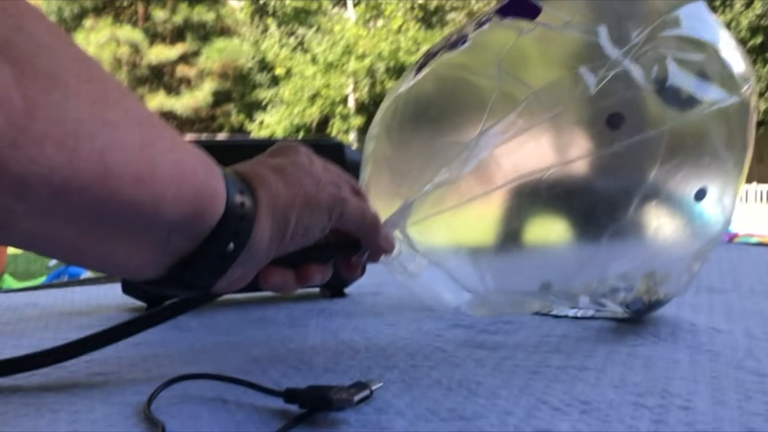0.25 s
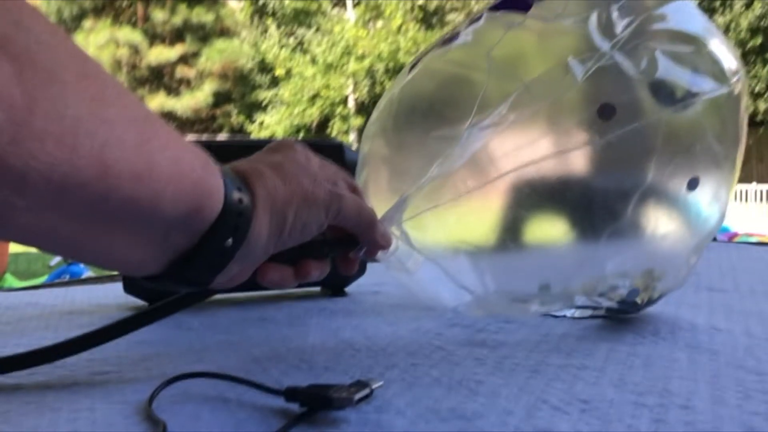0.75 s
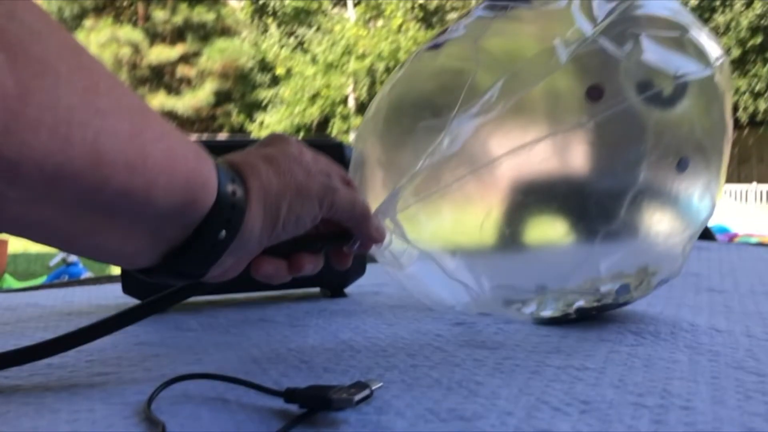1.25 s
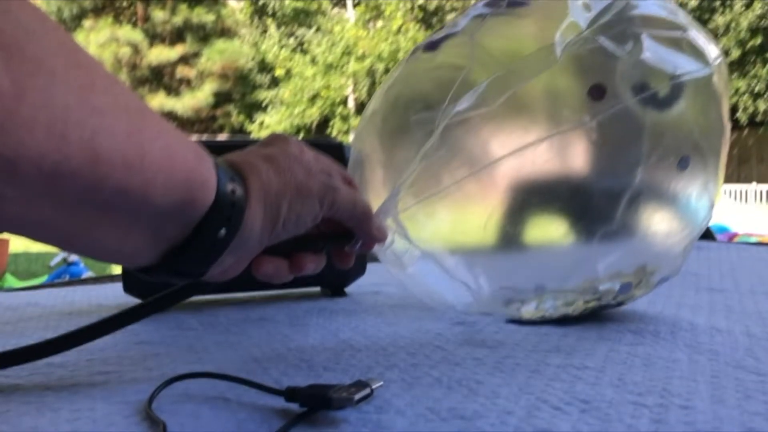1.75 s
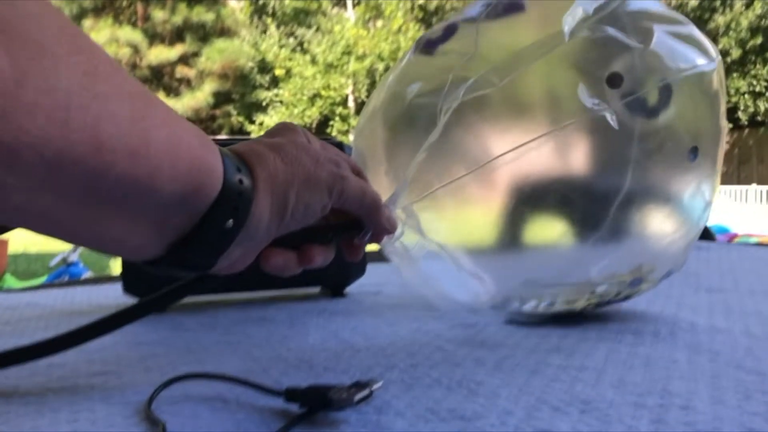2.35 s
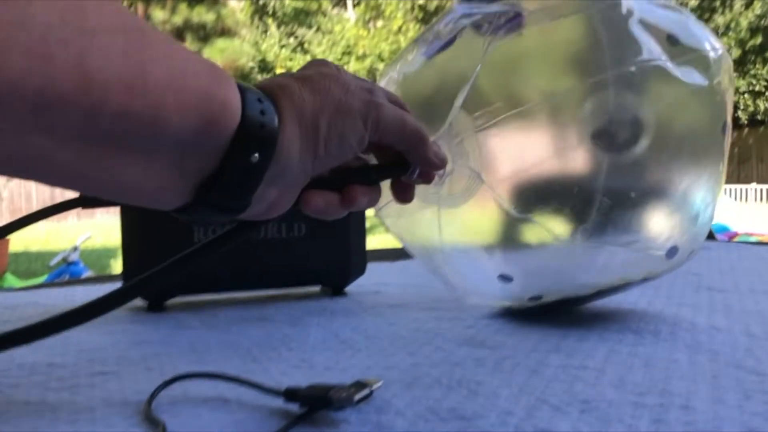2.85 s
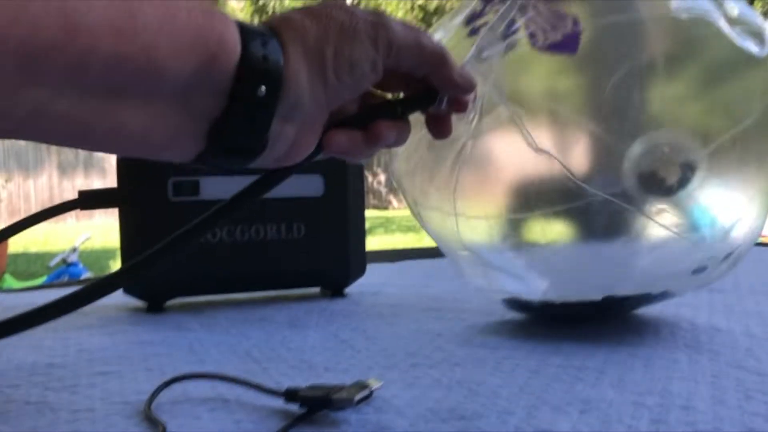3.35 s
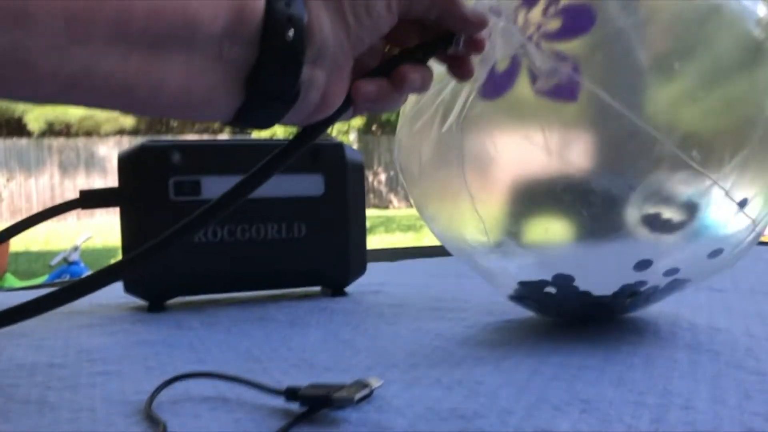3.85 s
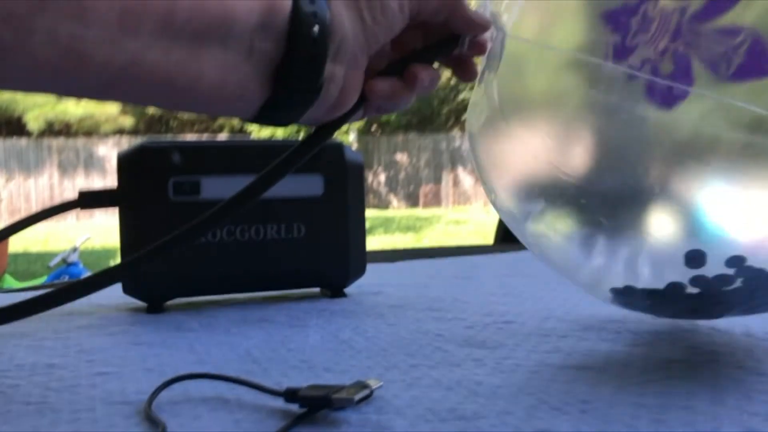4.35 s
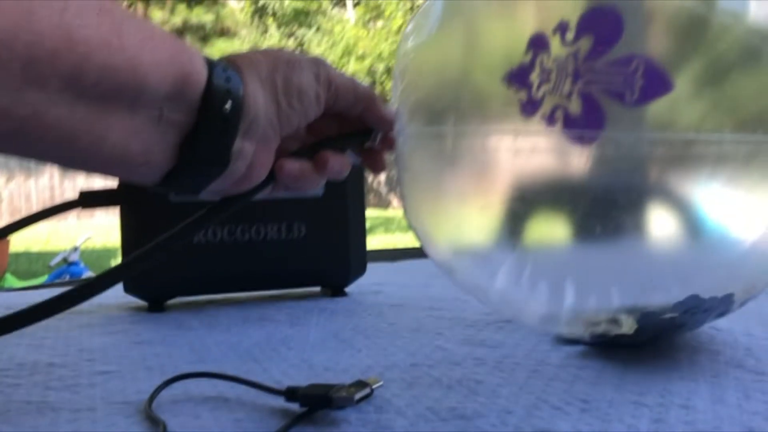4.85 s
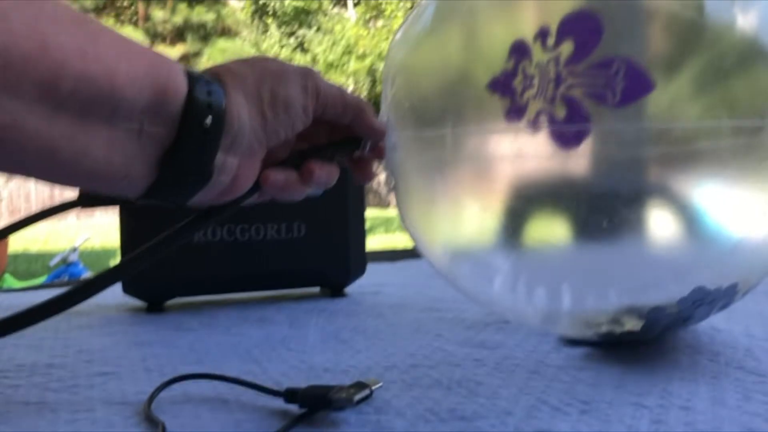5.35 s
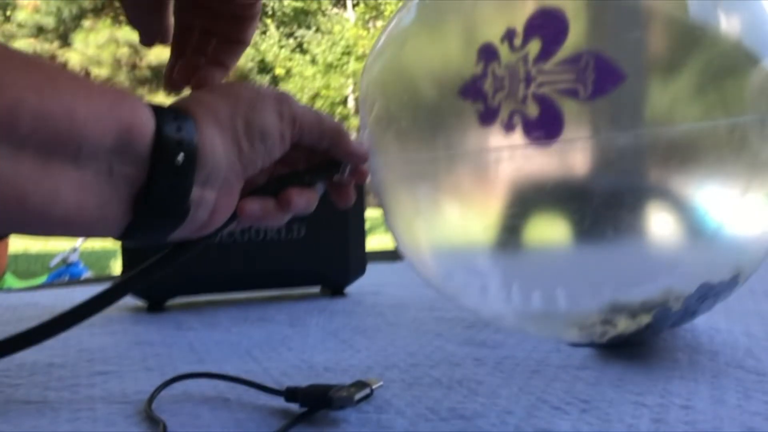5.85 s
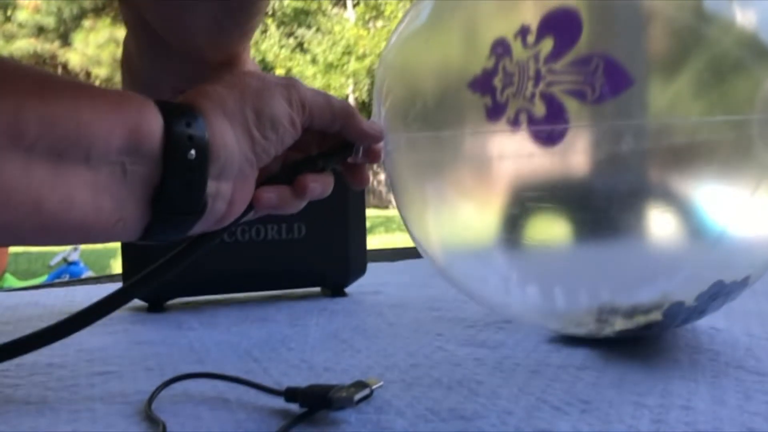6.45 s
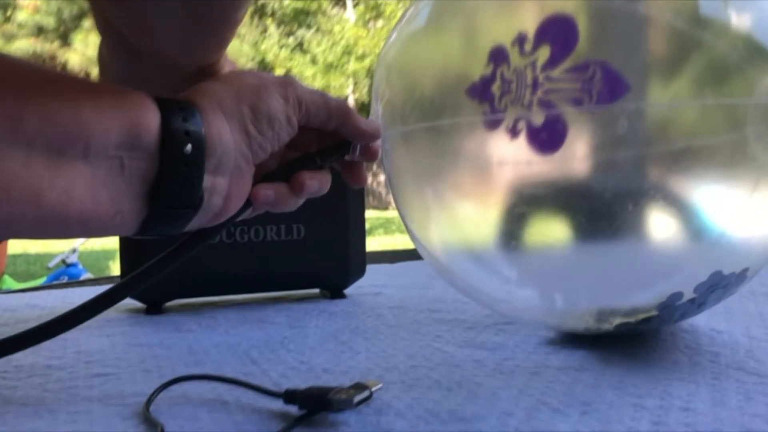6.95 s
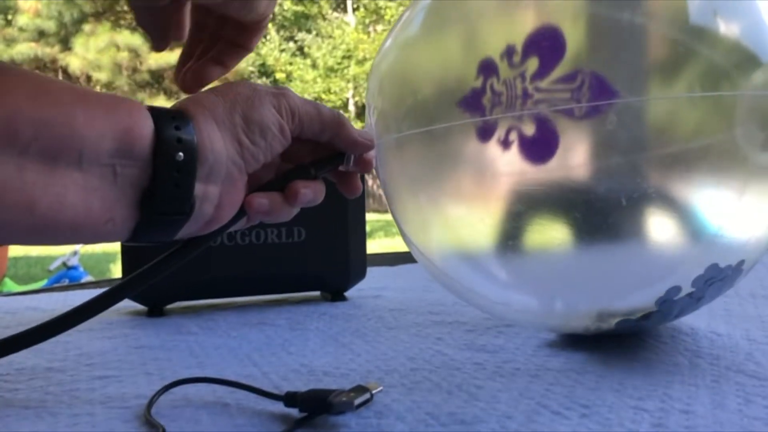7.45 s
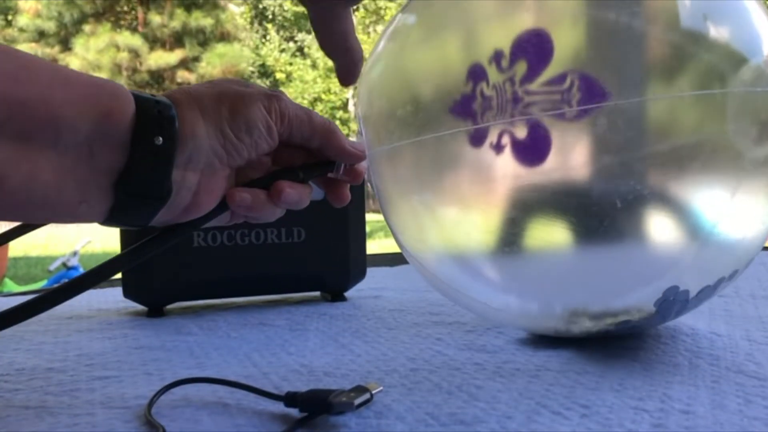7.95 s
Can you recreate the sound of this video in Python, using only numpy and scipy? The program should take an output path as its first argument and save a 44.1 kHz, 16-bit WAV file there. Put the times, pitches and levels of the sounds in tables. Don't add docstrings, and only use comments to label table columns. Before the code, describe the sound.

Harsh rattling drone of a little air pump filling a plastic ball, falling quickly in pitch to a halt, then soft knocks and crinkles.

```python
import sys
import numpy as np
from scipy import signal
from scipy.fft import rfft, irfft
from scipy.io import wavfile
from scipy.ndimage import uniform_filter1d

SR = 44100
rng = np.random.default_rng(int(sys.argv[2]) if len(sys.argv) > 2 else 0)


def wrap_up_sound(samples):
    columns = np.atleast_2d(samples).T
    tamed = np.clip(columns, -1, 1)
    steps = np.round(tamed * 32767).astype(np.int16)
    wavfile.write(sys.argv[1], SR, steps)


def attenuation_scalar(level_db):
    decades = np.asarray(level_db, float) / 20
    return 10 ** decades


N = 361608


def evened(x):
    return x / np.sqrt(np.mean(x ** 2) + 1e-20)


def curves(rows, off=-120.):
    s, *columns = np.transpose(rows)
    return [np.interp(np.arange(N) / SR, s, c, left=off, right=off) for c in columns]


def coloured(x, points):
    f, db = np.transpose(points)
    hz = np.fft.rfftfreq(N, 1 / SR)
    gain = attenuation_scalar(np.interp(np.log(hz + 1), np.log(f + 1), db))
    return evened(irfft(rfft(x) * gain, N))


def band(x, lo_hz, hi_hz):
    sos = signal.butter(4, [lo_hz, min(hi_hz, 20000)], "band", fs=SR, output="sos")
    return evened(signal.sosfilt(sos, x))


def ring(x, hz, width):
    r = np.exp(-np.pi * width / SR)
    w = 2 * np.pi * hz / SR
    return signal.lfilter([np.sin(w)], [1, -2 * r * np.cos(w), r * r], x)


def drift(rate_hz):
    size = int(SR / rate_hz)
    return evened(uniform_filter1d(uniform_filter1d(rng.standard_normal(N), size), size))


def stroke(turns, start, rise, fall):
    u = (turns - start) % 1
    return (1 - np.exp(-(u / rise) ** 2)) * np.exp(-u / fall)


def hits(turns, angle):
    return 1. * (np.diff(np.floor(turns - angle), prepend=-1) > 0)


def flaws(turns, size):
    return np.interp(turns % 1 * size, np.arange(size + 1), rng.standard_normal(size + 1))


OFF_S, COAST_S, FRICTION = 7.022, .41, .74
FULL_S = 7.3


def layer(rule, speed, dies=.05):
    slack_db, full_db, off_db, power = rule
    t = np.arange(N) / SR
    step = np.clip((t - OFF_S) / .03, 0, 1)
    level = attenuation_scalar(slack_db + full_db * np.minimum(t / FULL_S, 1) + off_db * step)
    return level * speed ** power * np.minimum(speed / dies, 1) ** 3.5


# (frequency [Hz], density [dB per Hz])
YARD_SPECTRUM = [(18, -53), (30, -29.5), (69, -3), (95, -8), (108, -10), (127, -1.5), (148, -14.5),
                 (214, -10), (361, -12.5), (793, -18.5), (2320, -37), (12400, -53), (15700, -57)]
YARD_DB = -47


def yard():
    return attenuation_scalar(YARD_DB + 0.66 * drift(5.4)) * coloured(rng.standard_normal(N), YARD_SPECTRUM)


# (frequency [Hz], width [Hz], gain [dB])
CASE_MODES = [(371, 90, 8), (820, 90, 0), (1190, 100, 7), (1910, 67, 2.5), (4180, 330, -8.5)]
TONE, OCTAVE = (-29.5, -6, 3.5, 0.5), (-26.5, 0.2, 1.5, 4)
LOADED_FROM, EASING = (0.12, .1), (1, 0)
TEETH_PART = 0.37
GEAR_TEETH, PINION_TEETH = 49, 11


def gears(turns, mesh_hz, speed):
    coasting = .45 * (np.arange(N) > 7.03 * SR)
    slack = 0.059 + .5 * coasting
    wobble = 0.062 * np.sin(2 * np.pi * (turns - .3))
    jitter = (0.013 + 0.22 * coasting) * drift(170)
    angle = 2 * np.pi * (GEAR_TEETH * turns + wobble + jitter)
    out = 0
    for k, (rule, start, ease) in enumerate(zip((TONE, OCTAVE), LOADED_FROM, EASING), start=1):
        u = (turns - start) % 1
        push = np.clip(u / 0.13, 0, 1) * np.clip((.58 - u) / 0.22, 0, 1)
        load = slack + push * (1 - .5 * u) * np.exp(-ease * u)
        boost_db = sum(d / (1 + (2 * (k * mesh_hz - f) / w) ** 2) for f, w, d in CASE_MODES)
        flutter = drift(160)
        wander_db = (1.1 + 3 * coasting) * flutter + .55 * evened(uniform_filter1d(flutter, size=5000))
        level = layer(rule, speed, TEETH_PART ** k) * attenuation_scalar(boost_db + wander_db)
        out = out + level * evened(load ** (1 + 0.071 * k)) * np.sqrt(2) * np.sin(k * angle)
    return out


# (angle [turns], mode frequency [Hz], width [Hz], level [dB], unevenness [dB])
VALVE_BLOWS = [(.74, 800, 42, -5, 3.5), (.74, 890, 45, -3, 5.5), (.74, 988, 54, -4, 4.5),
               (0.221, 980, 95, -11, 4), (.57, 1155, 58, -3.5, 3.5), (0.65, 513, 94, -20.5, -2),
               (0.5914, 702, 123, -6.5, 3), (0.57, 1465, 110, -9, 9.5), (.61, 1835, 73, 1.5, 6),
               (0.5, 2800, 530, -12, 20), (.62, 3890, 150, -5.5, 6.5), (0.5, 4180, 96, -4, -0.5),
               (0.25, 4080, 270, -5, 3), (0.12, 3200, 1200, -6, 9.5), (.77, 1835, 130, -3, 9)]


def valve_knocks(turns, rotor):
    knocks = np.zeros(N)
    for angle, hz, width, db, uneven_db in VALVE_BLOWS:
        chance = np.clip(rng.standard_normal(N), -1.8, 1.8)
        cycle = np.sin(2 * np.pi * (rotor + rng.random()))
        size = attenuation_scalar(min(uneven_db, 2.3) * (cycle + .5 * chance))
        play = .0013 * drift(60)
        struck = ring(hits(turns + play, angle) * size, hz, width)
        knocks += attenuation_scalar(db) * evened(ring(struck, hz, 2.7 * width))
    return evened(knocks)


# (frequency [Hz], width [Hz], level [dB])
CHAMBER_MODES = [(295.4, 15, 2), (401.4, 9.8, 2.5)]


def chamber_thump(turns):
    (hz, width, db), (hz2, width2, db2) = CHAMBER_MODES
    push = hits(turns, 0.905)
    lower = attenuation_scalar(db) * evened(ring(push, hz, width))
    upper = attenuation_scalar(db2) * evened(ring(push, hz2, width2))
    return band(lower - upper, 256, 472.5)


# (frequency [Hz], density [dB per Hz])
RATTLE_SPECTRUM = [(59, -44.5), (100, -36.5), (227, -8), (271, -14.5), (384, -8.5), (490, -14), (799, 0),
                   (1300, -3.5), (1820, -2), (2050, -2.5), (2320, -6), (3070, -8), (4580, 0), (4920, -2),
                   (6500, -20), (8450, -49.5), (14300, -120)]


def tooth_rattle(turns, rotor, speed):
    gate = evened(0.24 + stroke(turns, 0.47, 0.16, 0.25))
    teeth = .6 * flaws(turns, size=130) + .45 * flaws(rotor, size=30) + 1.25 * rng.standard_normal(N)
    rattle = coloured(teeth * gate, RATTLE_SPECTRUM)
    dull = signal.lfilter(*signal.butter(2, 2200, fs=SR), rattle)
    return dull + speed ** 0.64 * (rattle - dull)


# (multiple of the turn rate, level [dB])
CRANK_ORDERS = [(1, 1.5), (2, 0.5), (3, -10), (4, -5.5), (5, -22)]
# (multiple of the rotor rate, level [dB])
ROTOR_ORDERS = [(1, -56), (3, -56.5), (4, -71), (8, -57), (9, -44.5)]
TABLE = (-43.5, 2, -1, 0.5)
PRESS_S, PRESS_IN_S, LET_GO_S, LET_GO_OUT_S, PRESS_DB = 6.5, .2, 6.88, 0.11, -12


def table_shake(turns, rotor, speed):
    t = np.arange(N) / SR
    release = 1 - (t - LET_GO_S) / LET_GO_OUT_S
    press = np.clip(np.minimum((t - PRESS_S) / PRESS_IN_S, release), 0, 1)
    sway = attenuation_scalar(4 + PRESS_DB * press) * layer(TABLE, speed) * np.sin(2 * np.pi * turns)
    shake = sum(attenuation_scalar(db) * np.sin(2 * np.pi * k * (turns - .25)) for k, db in CRANK_ORDERS[1:])
    motor = sum(attenuation_scalar(db) * np.sqrt(2) * np.sin(2 * np.pi * k * rotor) for k, db in ROTOR_ORDERS)
    return sway + speed ** 2.1 * (attenuation_scalar(-40.0) * shake + motor)


KNOCK, THUMP = (-27, -0.55, 1, 0.3), (-32.5, 2, -1, 5)
BLOWS_DIE = 0.15


def housing(turns, speed):
    rotor = turns * GEAR_TEETH / PINION_TEETH
    blows = speed ** 1.1 * valve_knocks(turns, rotor) + attenuation_scalar(1.5) * tooth_rattle(turns, rotor, speed)
    thump = layer(THUMP, speed) * chamber_thump(turns)
    return layer(KNOCK, speed, BLOWS_DIE) * blows + thump + table_shake(turns, rotor, speed)


# (frequency [Hz], density [dB per Hz])
HISS_SPECTRUM = [(2880, -35), (4900, 9), (5450, -1), (5950, 1.5), (6810, -4.5), (7260, -14), (7540, -4),
                 (8640, -10), (10200, -13), (14000, -11), (15600, -12)]
# (frequency [Hz], width [Hz], level [dB])
NOZZLE_MODES = [(5700, 34, 9.5), (6090, 19, 4.5), (7100, 93, 2.5), (7500, 48, -1), (8470, 67, -2.5),
                (8840, 83, -6), (9300, 88, -10.5), (11500, 92, -4)]
# (time [s], resonance of the gap [Hz], leak [dB], nozzle turned to the listener [dB])
VALVE_GRIP = [(0.0, 5370, 0, 0.5), (1.27, 5200, -0.5, -1), (1.9, 5300, 3, -1), (2.25, 5570, 5, -1),
              (2.68, 5610, -0.5, -2.5), (3.01, 5360, 0.5, 1.5), (3.26, 5800, -0.5, -0.5),
              (3.44, 5560, 2, 0), (3.85, 5450, -1.5, 0), (4.04, 5200, -1, -4), (4.24, 5300, -1.5, -2),
              (4.5, 5690, -1.5, 0.5), (4.87, 5700, 1, 0), (5.9, 5660, 1, 1.5), (6.2, 5900, 1.5, 2),
              (6.6, 5700, -2.5, 0), (7.05, 5410, -4, -2.5)]
LEAK_HISS, JET_HISS, TOP_HISS = (-33, 1, -0.5, 0.7), (-38, 6, -1.5, 0.2), (-37.5, 3.5, 3, 0.5)
AIR_DIES = 0.35
JET_FACING, TOP_FACING = 1.37, 0.89
HOSE_HZ, HOSE_ECHO = 467.5, 0.54


def nozzle(turns, speed):
    gap_hz, leak_db, facing_db = curves(VALVE_GRIP + [(N / SR, *VALVE_GRIP[-1][1:])])
    white, n = rng.standard_normal(N), np.arange(N)
    lag = SR / HOSE_HZ * (1 + 0.013 * drift(1.3))
    echoes = sum(HOSE_ECHO ** k * np.interp(n - k * lag, n, white) for k in range(5))
    air = coloured(echoes, HISS_SPECTRUM)
    white = rng.standard_normal(N)
    whistles = np.zeros(N)
    for hz, width, db in NOZZLE_MODES:
        swell_db = 6.6 * np.tanh(0.94 * drift(11) + 0.78 * drift(1.9))
        whistles += attenuation_scalar(db + swell_db) * evened(ring(white, hz, width))
    air += attenuation_scalar(-7.5) * evened(whistles)
    turn = np.exp(2j * np.pi * np.cumsum(gap_hz) / SR)
    smooth = signal.lfilter([1], [1, -np.exp(-np.pi * 250 / SR)], white / turn)
    leak = evened((turn * smooth).real)
    low = evened(band(air, 4840, 6980) + attenuation_scalar(-6.0 + 2.2 * drift(22)) * band(leak, 4830, 6600))
    puff = evened(0.26 * speed ** 2.5 + stroke(turns, 0.42, 0.13, 0.27)) * attenuation_scalar(0.75 * drift(90))
    low = layer(LEAK_HISS, speed, AIR_DIES) * attenuation_scalar(leak_db) * low
    jet = layer(JET_HISS, speed, AIR_DIES) * attenuation_scalar(JET_FACING * facing_db) * band(air, 6740, 9570)
    top = layer(TOP_HISS, speed, AIR_DIES) * attenuation_scalar(TOP_FACING * facing_db) * band(air, 9960, 17000)
    return puff * (low + jet + top)


# (time [s], peak level [dB], length [s])
HAND_SHIFTS = [
    (.04, -33, .08),
    (.27, -32, .1),
    (3.72, -41, .3),
    (4.04, -42, .08),
    (5.54, -42.5, .4),
    (6.75, -33.5, .12),
    (6.858, -31.5, .08),
]


def hands():
    t = np.arange(N) / SR
    rumble = attenuation_scalar(-48) + sum(attenuation_scalar(db) * np.exp(-((t - s) / length) ** 2) for s, db, length in HAND_SHIFTS)
    return attenuation_scalar(-12.0) * rumble * (t < 7.35) * band(rng.standard_normal(N), 104, 304)


# (time [s], level [dB])
TOOTH_GRIND = [
    (7.175, -25.5),
    (7.181, -30),
    (7.213, -23),
    (7.219, -33),
    (7.319, -34.5),
    (7.36, -56),
]
# (frequency [Hz], width [Hz], level [dB])
GRIND_MODES = [(371, 59, -9.5), (868, 37, 1), (1170, 110, 3), (1806, 87, -1.5), (3900, 300, -17)]
# (time [s], peak level [dB], pitch [Hz])
LOOSE_KNOCKS = [
    (7.099, -12.5, 860),
    (7.128, -11.5, 1200),
    (7.171, -15, 1840),
    (7.223, -18, 1020),
    (7.31, -22.5, 368),
]


def run_down():
    drag = rng.standard_normal(N) * attenuation_scalar(2.5 * drift(150))
    scrape = evened(sum(attenuation_scalar(db) * evened(ring(drag, f, w)) for f, w, db in GRIND_MODES))
    out = attenuation_scalar(curves(TOOTH_GRIND)[0] - 3.5) * scrape
    for s, db, hz in LOOSE_KNOCKS:
        click = 1. * (np.arange(N) == round(s * SR))
        bright = min(hz / 2400, .5) ** 1.5 * ring(click, 3600, 1500)
        out += attenuation_scalar(db - 1.5) * (ring(click, hz, 95) + bright)
    return out


# (time [s], peak level [dB], pitch [Hz])
CASE_ROCKS = [
    (7.382, -33, 317),
    (7.428, -36, 374),
    (7.488, -34, 450),
    (7.539, -33, 437),
    (7.554, -35, 480),
    (7.601, -33, 423),
    (7.662, -36, 447),
]


def rocking():
    out, t = np.zeros(N + 2000), np.arange(2000) / SR
    for s, db, hz in CASE_ROCKS:
        thud = np.sin(2 * np.pi * hz * t)
        thud += 0.33 * np.sin(2 * np.pi * rng.uniform(1150, 1400) * t)
        thud += 0.33 * np.sin(2 * np.pi * 800 * t)
        envelope = np.exp(-t / 0.0071) * (1 - np.exp(-t / 0.00062))
        out[round(s * SR):][:2000] += attenuation_scalar(db - 2) * thud * envelope
    return out[:N]


# (time [s], peak level [dB], pitch [Hz], bright edge [dB])
PLASTIC_TICKS = [(7.442, -31.5, 4200, -24), (7.5073, -47, 3070, -29), (7.5418, -52, 2500, -25.5),
                 (7.6894, -54, 5070, -23), (7.7044, -47, 4920, -21), (7.7674, -52, 2510, -24),
                 (7.86, -38, 4620, -15), (7.9603, -46, 2860, -31), (8.0253, -40, 3010, -24.5),
                 (8.0374, -43, 3980, -23), (8.0465, -33, 3780, -24), (8.0544, -37, 3810, -25),
                 (8.0625, -32, 3940, -28), (8.1614, -38, 3800, -33), (8.1734, -39, 3970, -28),
                 (8.1824, -42, 3730, -28), (8.1894, -34, 4080, -27)]


def ticking():
    out, t = np.zeros(N + 2000), np.arange(2000) / SR
    for s, db, hz, bright_db in PLASTIC_TICKS:
        snap = (t == 0) + 0.21 * rng.standard_normal(2000) * np.exp(-t / 0.0014)
        body = ring(snap, hz, 2600)
        edge = attenuation_scalar(bright_db) * np.diff(snap, prepend=0)
        out[round(s * SR):][:2000] += attenuation_scalar(db) * (body / abs(body).max() + edge)
    return out[:N]


FIZZ = (7.861, -61, .015)  # (time [s], level [dB], length [s])


def air_spit():
    out, t = np.zeros(N), np.arange(2000) / SR
    s, db, length = FIZZ
    spit = np.diff(rng.standard_normal(2001)) * np.exp(-(t / length) ** 4)
    out[round(s * SR):][:2000] += attenuation_scalar(db) * spit
    return out


# (time [s], level [dB])
CRUMPLE_LEVEL = [
    (8.05, -55),
    (8.082, -37),
    (8.106, -35),
    (8.188, -43.5),
    (8.2, -53),
]
# (frequency [Hz], density [dB per Hz])
CRUMPLE_SPECTRUM = [(240, -45), (400, -10), (1100, -4.5), (2070, -8), (2230, -9), (2530, -11.5), (3080, -8),
                    (5280, -13.5), (6250, -20), (6960, -22), (15700, -39)]


def crumpling():
    grains = rng.standard_normal(N)
    grains *= attenuation_scalar(4 * np.minimum(rng.exponential(1, N), 2))
    grains *= rng.random(N) < 2500 / SR
    return attenuation_scalar(curves(CRUMPLE_LEVEL)[0]) * coloured(grains + 1.3 * rng.standard_normal(N), CRUMPLE_SPECTRUM)


# (time [s], tooth rate [Hz])
MESH_SPEED = [(0.0, 2302.6), (1.6, 2301.7), (2.15, 2303), (3.75, 2296.2), (4.3, 2299.2), (5.2, 2298.9),
              (5.95, 2293.2), (6.3, 2304.5), (6.65, 2299.1), (7.02, 2299.8)]


def scene():
    t = np.arange(N) / SR
    coast = (1 + FRICTION) * np.exp(-np.maximum(t - OFF_S, 0) / COAST_S) - FRICTION
    mesh_hz = np.interp(t, *np.transpose(MESH_SPEED)) * np.maximum(coast, 0)
    turns = .009 + np.cumsum(mesh_hz) / GEAR_TEETH / SR
    speed = mesh_hz / mesh_hz[0]
    background = yard()
    pump = gears(turns, mesh_hz, speed) + housing(turns, speed) + hands() + nozzle(turns, speed)
    ending = run_down() + rocking() + ticking() + air_spit() + crumpling()
    return (background + pump + ending)[None]


def top_cut(x):
    return signal.sosfilt(signal.butter(12, 16760, fs=SR, output="sos"), x)


def record(dry):
    cut = signal.sosfilt(signal.butter(4, 36, "high", fs=SR, output="sos"), dry)
    low_pass = signal.firwin(1001, 15730, window=("kaiser", 7), fs=SR)
    limited = signal.oaconvolve(cut, low_pass[None], "same")
    return top_cut(limited)


dry = scene()
out = record(dry)
wrap_up_sound(out)
```